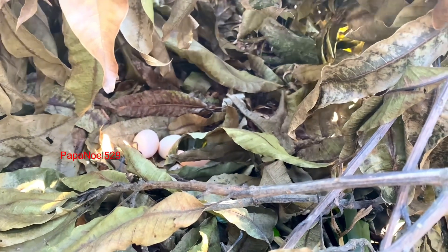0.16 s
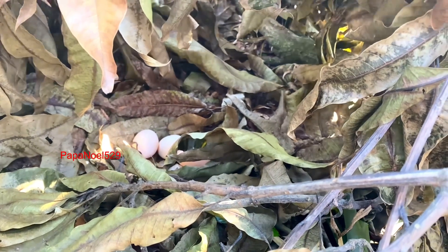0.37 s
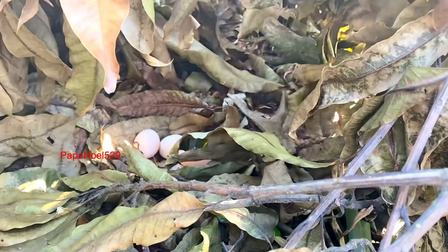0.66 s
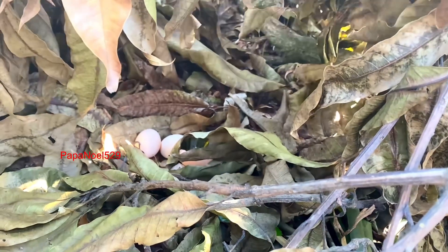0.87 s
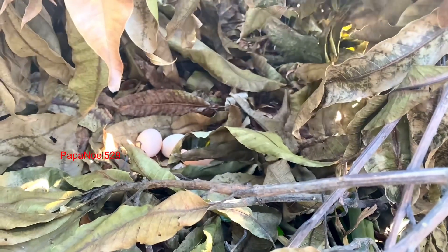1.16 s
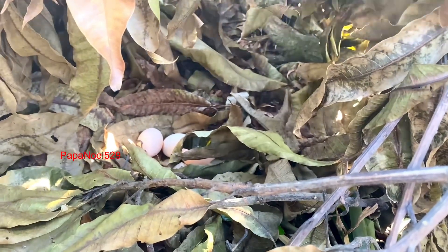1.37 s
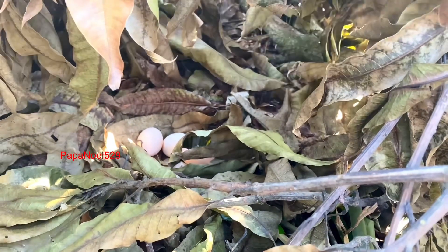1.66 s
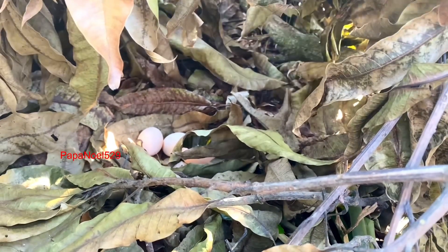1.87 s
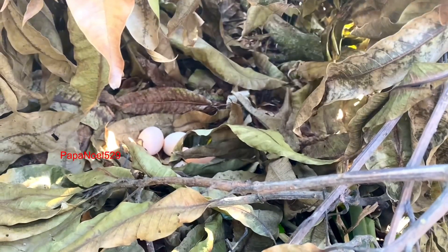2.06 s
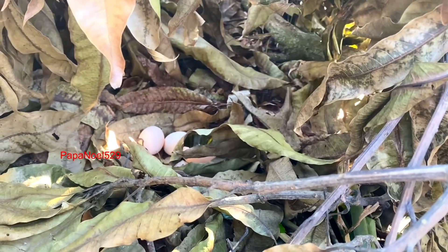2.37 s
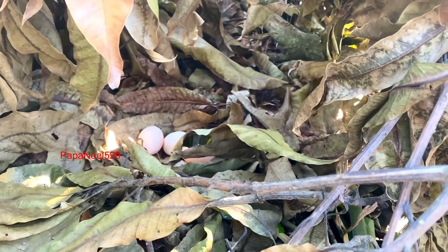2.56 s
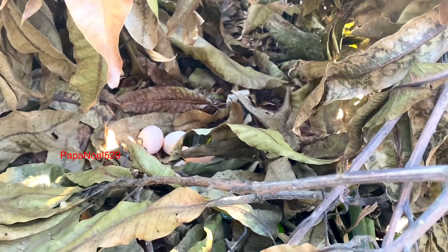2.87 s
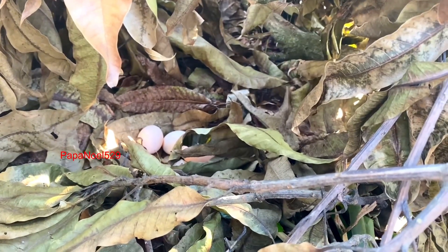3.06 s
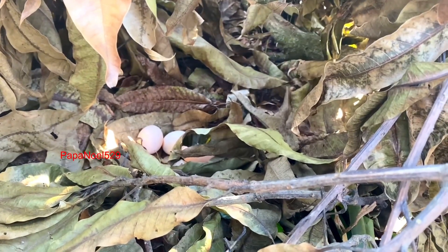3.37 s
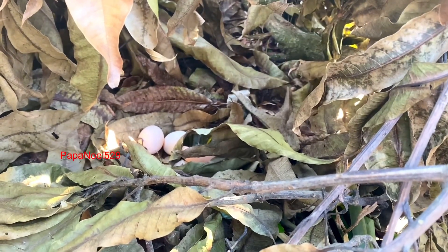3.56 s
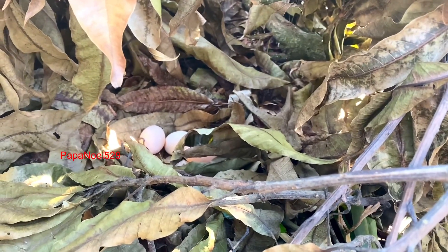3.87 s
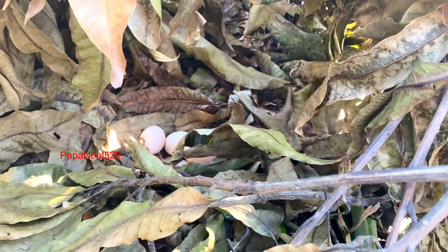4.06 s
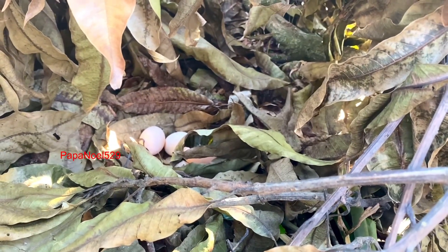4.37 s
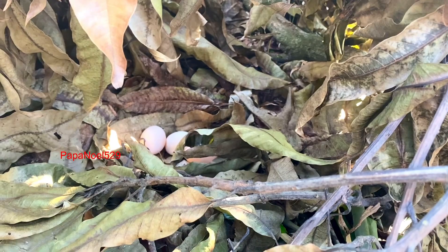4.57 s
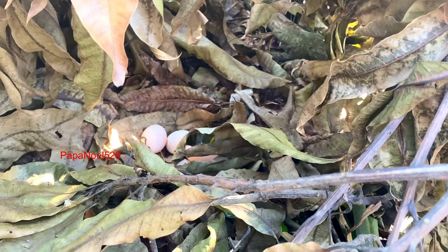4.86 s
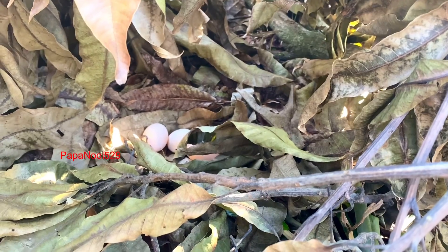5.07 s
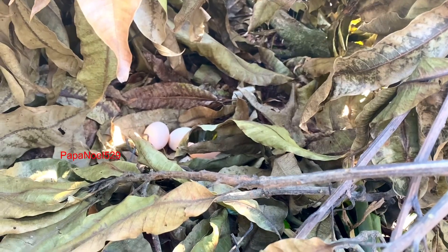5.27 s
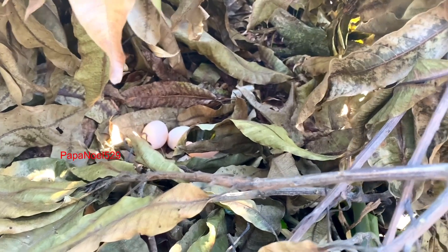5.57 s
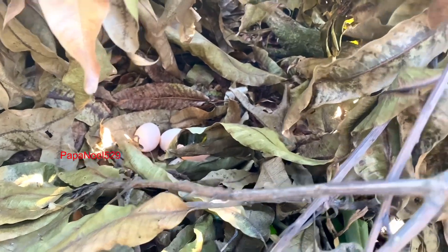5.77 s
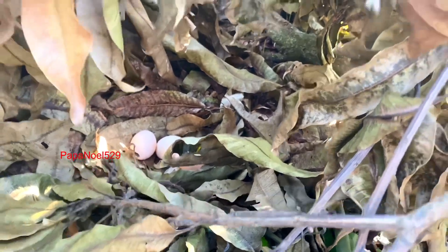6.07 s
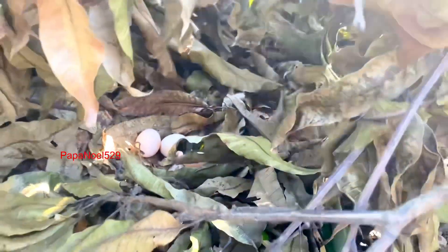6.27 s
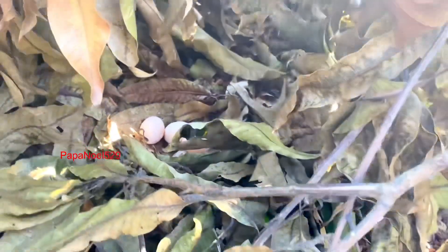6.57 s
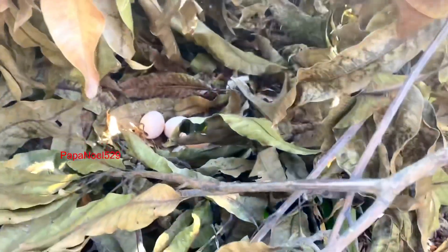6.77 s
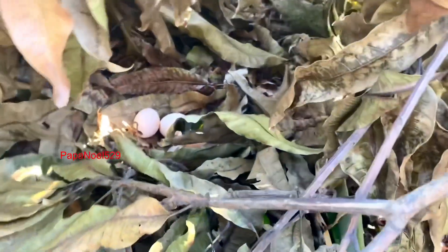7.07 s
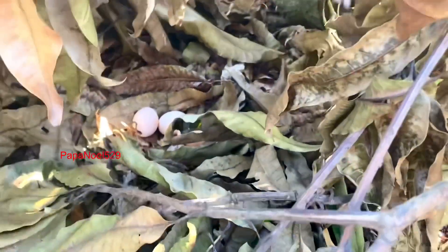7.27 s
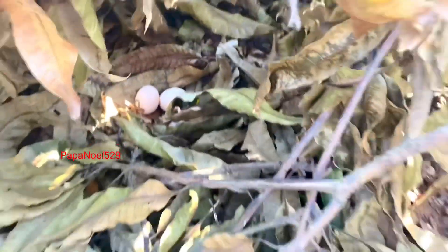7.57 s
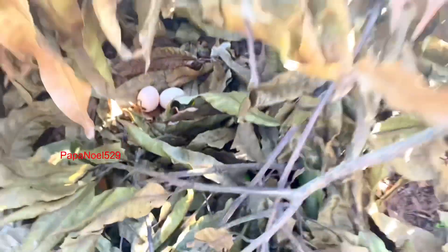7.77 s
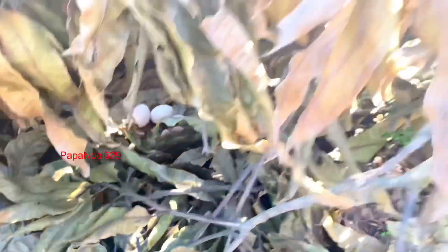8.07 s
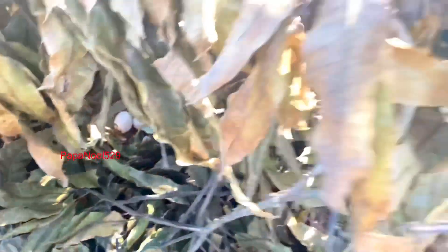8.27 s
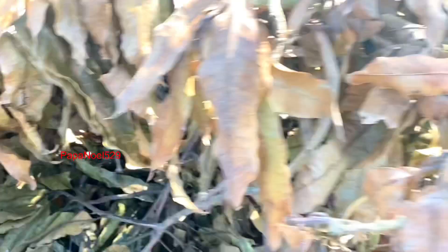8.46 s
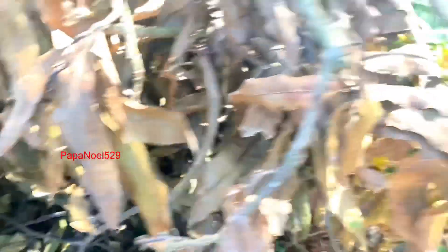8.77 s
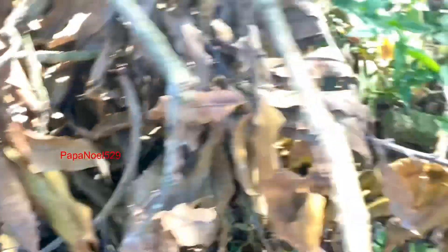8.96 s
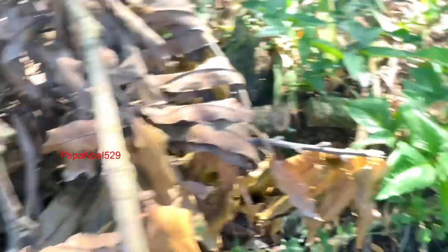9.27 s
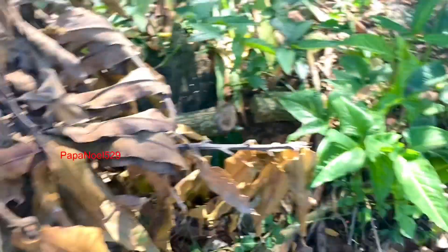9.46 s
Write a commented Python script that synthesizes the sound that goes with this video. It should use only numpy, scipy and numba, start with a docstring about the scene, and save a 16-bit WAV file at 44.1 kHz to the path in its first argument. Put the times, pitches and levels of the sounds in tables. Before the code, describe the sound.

A nearby hen cackles in runs of short clucks and rasping squawks, while another fowl answers and dry leaves rustle and snap.

```python
"""Hen cackling in the bushes

A hen cackles near her nest: runs of short clucks, each broken by a long rasping squawk. A second fowl
further off answers with faint clucks and higher calls that start clean and break up. Both voices are
clapping membranes ringing a throat and a windpipe. Dry leaves rustle and snap close by, a hand bumps
the microphone, and a distant motor hums and fades."""
import sys
import numpy as np
from scipy import signal
from scipy.fft import rfft, irfft, next_fast_len
from scipy.io import wavfile
from scipy.ndimage import uniform_filter1d
from numba import njit

SR = 44100
rng = np.random.default_rng(int(sys.argv[2]) if len(sys.argv) > 2 else 0)


def to_wav(s):
    """Save 16-bit WAV."""
    ch = np.atleast_2d(s).T  # columns
    pcm = np.round(np.clip(ch, -1, 1) * 32767)  # PCM
    wavfile.write(sys.argv[1], SR, pcm.astype(np.int16))


N = 424683
T = np.arange(N) / SR


def undb(db):
    """Decibels to gain."""
    return 10 ** (np.asarray(db) / 20)


def unit(x):
    """Scale to rms 1."""
    return x / np.sqrt(np.mean(x ** 2) + 1e-18)


def steady(x):
    """Ride the level to a running rms of 1, keeping the fast flutter."""
    return x / np.sqrt(np.abs(uniform_filter1d(x ** 2, size=1500)) + 1e-12)


def follow(rows, t):
    """The columns of a curve at times t."""
    times, *columns = np.transpose(rows)
    return [np.interp(t, times, column) for column in columns]


def over_hz(rows, size):
    """The columns of a spectrum on the bins of a transform."""
    hz, *columns = np.transpose(rows)
    bin_hz = np.arange(size // 2 + 1) * SR / size
    return [np.interp(np.log(bin_hz + 1), np.log(hz), column) for column in columns]


def colour(x, spectrum, size=2048):
    """Minimum-phase EQ through points of (frequency [Hz], gain [dB])."""
    cepstrum = irfft(np.log(undb(over_hz(spectrum, size)[0])))
    cepstrum[1:size // 2] *= 2
    cepstrum[size // 2 + 1:] = 0
    return signal.fftconvolve(x, irfft(np.exp(rfft(cepstrum))))[:len(x)]


def add(track, at_s, x):
    """Mix a sound into a track."""
    start = max(int(at_s * SR), 0)
    x = x[..., :N - start]
    track[..., start:start + x.shape[-1]] += x


def drift(rate_hz, length=N):
    """Smooth random modulation around zero."""
    hold = int(SR / rate_hz)
    steps = np.repeat(rng.standard_normal(N // hold + 1), hold)
    return 0.88 * uniform_filter1d(steps, hold)[:length]


def gate(t, attack_s, release_s):
    """Linear fade in and out."""
    return np.clip((t - t[0]) / attack_s, 0, 1) * np.clip((t[-1] - t) / release_s, 0, 1)


@njit
def resonance(x, hz, width_hz):
    """Band-pass with a moving centre."""
    out, band_state, low_state = np.empty(len(x)), 0., 0.
    for i in range(len(x)):
        tuning, damping = np.tan(np.pi * hz[i] / SR), width_hz / hz[i]
        band = (band_state + tuning * (x[i] - low_state)) / (1 + tuning * (tuning + damping))
        band_state = 2 * band - band_state
        low_state += 2 * tuning * band
        out[i] = damping * band
    return out


def pan(x, placement, bearing=1):
    """A source off to one side reaches left and right with different phase and level."""
    size = next_fast_len(len(x) + 512)
    lead, balance_db = over_hz(placement, size)
    left = np.exp(.5j * lead * bearing) * undb(balance_db / 2)
    return irfft(rfft(x, size) * np.array([left, 1 / left]), size)[:, :len(x)]


def yard(x, near_db, near_s, far_db, t60_s):
    """Adds quick, bright scatter from ground and bushes, then a thin tail from the trees."""
    t = np.arange(SR // 2) / SR
    out = []
    for channel in x:
        near, far = rng.standard_normal((2, len(t)))
        near = colour(near, [(600, -10.5), (1400, 1.5), (3000, 0.5)])
        near = unit(near * (t > .002) * np.exp(-t / near_s))
        far = colour(far, [(300, -0.5), (900, -9.5), (2200, 2.5), (9000, -9.0)])
        far = unit(far * np.clip(t / 0.069, 0, 1) * undb(-60 * t / t60_s))
        echo = (undb(near_db) * near + undb(far_db) * far) / np.sqrt(len(t))
        out.append(channel + signal.fftconvolve(channel, echo)[:N])
    return np.array(out)


# The motor's hum, sagging and fading (time [s], pitch [Hz], relative level [dB])
MOTOR_HUM = [(0, 102.8, -48), (2.5, 99, -47.5), (4, 101.3, -50), (5.3, 100.3, -55), (6.2, 101, -60.5),
             (9.63, 95.25, -62)]


def motor(trim_db=-1):
    """A distant motor hums on one low, slightly unsteady tone."""
    hz, db = follow(MOTOR_HUM, T)
    phase = 2 * np.pi * np.cumsum(hz + .5 * drift(10)) / SR
    return np.sqrt(2) * np.sin(phase) * undb(db + trim_db + .6 * drift(5.7))


# Bass-heavy outdoor air (frequency [Hz], gain [dB])
AIR_EQ = [(20, -40.5), (45, -6), (75, 9), (125, -4), (200, -13), (400, -26.5), (900, -35), (2000, -41),
          (6000, -43), (15000, -60.5)]


def open_air(level_db=-56, width_db=-13):
    """A low murmur of open air, as a narrow mid/side noise bed."""
    mid, side = (unit(colour(rng.standard_normal(N), AIR_EQ)) * undb(0.16 * drift(5)) for _ in range(2))
    return undb(level_db) * (mid + undb(width_db) * side * np.array([[1], [-1]]))


# Leaves stirring round the hand (time [s], level [dB])
LEAF_STIR = [(0, -54), (1.6, -55), (2.2, -63), (2.8, -74), (4.85, -76.5), (5.5, -57), (6.1, -51),
             (6.8, -51.5), (7.5, -49.5), (8.9, -50), (9.45, -57.5)]
# The hand brushing through leaves (time [s], length [s], level [dB])
HAND_BRUSHES = [(0.097, 0.25, -48), (0.452, 0.11, -47.5), (0.645, 0.099, -46.5), (0.933, 0.27, -50),
                (1.4, 0.225, -52.5), (4.896, 0.21, -59), (6.933, 0.71, -46.5), (7.409, 0.37, -43),
                (7.853, 0.2, -41.5), (7.994, 0.38, -46), (8.557, 0.34, -42), (9.032, 0.32, -42.5),
                (9.501, 0.16, -40)]


def stirring():
    """How hard the leaves are moved: a slow stir, and a swell for each brush of the hand."""
    power = undb(follow(LEAF_STIR, T)[0]) ** 2
    for at_s, length_s, db in HAND_BRUSHES:
        swell = gate(np.arange(0, length_s, 1 / SR), attack_s=0.032, release_s=0.07)
        add(power, at_s, (undb(db) * swell) ** 2)
    return np.sqrt(power)


# Papery tone of dry leaves (frequency [Hz], gain [dB])
LEAF_EQ = [(100, -7), (250, -4), (700, 2), (1500, -3.5), (3000, -1), (6500, -1.5), (9000, -6.5),
           (12000, -7), (16000, -12.5)]


def leaves(grains_per_s=1200, spread_db=2.5, ticks_per_s=36, tick_db=6.5, left_lag_s=0.0002):
    """Dry leaves crackle in dense tiny grains and single crisp ticks, a little to the right."""
    grains = (rng.random((3, N)) < grains_per_s / SR) * rng.standard_normal((3, N))
    left, right, shared = grains * undb(spread_db * np.minimum(rng.exponential(size=(3, N)), 4))
    shared += (rng.random(N) < ticks_per_s / SR) * rng.standard_normal(N) * undb(tick_db)
    left += 0.61 * np.roll(shared, round(left_lag_s * SR))
    right += 0.61 * shared
    crackle = np.array([unit(colour(side, LEAF_EQ)) for side in (left, right)])
    flicker = undb(1.2 * drift(30) + 1.5 * drift(150))
    return yard(crackle * stirring() * flicker, near_db=3.0, near_s=0.00419, far_db=-26, t60_s=0.33)


# Twigs and dry leaves breaking (time [s], dry peak [dB], decay [s])
SNAP_HITS = [(0.101, -20, .0025), (0.1444, -27, .001), (0.2064, -18, 0.0021), (0.417, -28.5, .002),
             (0.4642, -23, 0.00184), (.692, -28, 0.00117), (0.91, -28.5, 0.0037), (0.97, -26, 0.0012),
             (1.355, -26.5, .002), (1.701, -37, .002), (1.787, -39, .002), (1.8095, -29, .003),
             (2.885, -51.5, 0.0027), (2.949, -46, .0025), (3.265, -60, .002), (3.608, -48, .0025),
             (5.299, -36.5, .0015), (6.0881, -41, .002), (6.936, -23.5, 0.023), (7.178, -19.5, 0.0019),
             (7.809, -25, .0025), (7.9039, -25, 0.016), (7.985, -24, .0012), (8.024, -20, .0012),
             (8.4262, -30, .001), (8.504, -30, .002), (8.514, -25, 0.00294), (8.779, -21, 0.00305),
             (8.945, -37, 0.00085), (8.983, -27.5, 0.00118), (9.39, -42, 0.0009), (9.404, -41, 0.00081),
             (9.5048, -28.5, .002), (9.5988, -15.5, 0.0011)]
# Broad, bright crack of a twig (frequency [Hz], gain [dB])
SNAP_EQ = [(150, -7.5), (700, 1.5), (1500, -1), (3500, 1), (7000, 0.5), (12000, -2.5), (16000, -5)]


def snaps():
    """Close up, twigs crack in a sharp tick and whole leaves crunch a little longer."""
    out, t = np.zeros((2, N)), np.arange(SR // 15) / SR
    for at_s, db, decay_s in SNAP_HITS:
        left, right, shared = rng.standard_normal((3, len(t))) * np.exp(-t / decay_s)
        snap = np.array([colour(shared + .5 * side, SNAP_EQ) for side in (left, right)])
        add(out, at_s, snap / np.abs(snap).max() * undb(db))
    return yard(out, near_db=-2, near_s=0.008, far_db=-24, t60_s=0.33)


def syrinx(hz, rough, halving, jitter, shimmer_db, air):
    """Membranes clap once a cycle; when rough, early or late, strong or weak, with a puff of air."""
    phase = np.cumsum(hz) / SR
    cycle = np.arange(int(phase[-1]))
    onset = np.interp(cycle, phase, np.arange(len(hz)))
    period, wild, weak = (np.interp(cycle, phase, curve + 0 * hz) for curve in (SR / hz, rough, halving))
    timing, force = rng.standard_normal((len(cycle), 2)).T
    odd = cycle % 2  # halving delays and weakens every other clap, adding a sub-octave
    onset = np.clip(onset + period * jitter * (wild * timing + weak * odd), 0, len(hz) - 2)
    strength = undb(shimmer_db * wild * force) * (1 - np.clip(weak, 0, 1) * odd)
    sample, fraction = onset.astype(int), onset % 1
    claps = np.bincount(sample, strength * (1 - fraction), len(hz))
    claps += np.bincount(sample + 1, strength * fraction, len(hz))
    puffs = unit(np.exp(-(phase % 1) / 0.75) * rng.standard_normal(len(hz)))
    return unit(claps) + air * rough * puffs


def windpipe(x, spacing_hz=480, width_hz=120, drift_hz=105, blunt_hz=5450, wander_s=0.0447):
    """The windpipe rings in a ladder of resonances, blunter up top, that wander as the neck strains."""
    position = np.arange(len(x)) / SR / wander_s
    steps = np.arange(int(position[-1]) + 2)
    out = 0
    for mode in range(2, 30):
        blunt = 1 + (mode * spacing_hz / blunt_hz) ** 2
        detune, swell = (np.interp(position, steps, rng.standard_normal(len(steps))) for _ in range(2))
        hz = np.clip((mode + .5) * spacing_hz + drift_hz * np.sqrt(blunt) * detune, 100, .45 * SR)
        strength = rng.choice([-1, 1]) * undb(3.0 * swell) / np.sqrt(blunt)
        out = out + strength * resonance(x, hz, width_hz * blunt)
    return out


# Hollow body of either bird's cluck (frequency [Hz], gain [dB])
CLUCK_BODY_EQ = [(100, -22.5), (200, -19), (470, -4.5), (590, -10), (750, -3), (1020, -1.5), (1360, -11),
                 (2200, -21)]


def cluck(throat_hz, rasp_eq, rasp_db, width_hz, chest_db):
    """A few slow claps speed up and swell while the beak opens and shuts; no two clucks are alike."""
    usual_s, usual_start_hz, usual_top_hz, usual_throat_hz = .06, 170.4, 328.7, 949.4
    t = np.arange(int(1.45 * usual_s * SR)) / SR
    stretch, lift = 1 + np.array([.05, .14]) * rng.standard_normal(2)
    progress = np.clip(t / (usual_s * stretch), 0, 1)
    hz = lift * (usual_start_hz + (usual_top_hz - usual_start_hz) * np.sin(np.pi * progress * .7))
    effort_db, = follow([(0, -12.5), (.18, -9.5), (.38, -4), (.58, -8), (.8, -15.5), (1, -31.5)],
                        progress)
    source = syrinx(hz, rough=.7, halving=0, jitter=.11, shimmer_db=1.5, air=.15) * undb(effort_db)
    formant_hz = throat_hz * (0.84 + 0.119 * np.sin(np.pi * progress))
    body = resonance(colour(source, CLUCK_BODY_EQ), formant_hz, width_hz)
    # the air sacs hoot an octave below the throat
    chest_eq = [(90, -11), (210, 9), (330, -1), (480, 1), (640, -17), (1500, -19.5)]
    chest = resonance(colour(source, chest_eq), formant_hz / 2, width_hz=103.)
    # the upper resonances shift with the throat
    rasp = colour(windpipe(source), [(f * throat_hz / usual_throat_hz, db) for f, db in rasp_eq])
    voice = unit(body) + undb(rasp_db) * unit(rasp) + undb(chest_db) * unit(chest)
    return unit(voice) * gate(t, 0.0034, 0.0098)


# The far fowl's faint clucks (time [s], level [dB], throat resonance [Hz])
FAR_CLUCK_CUES = [(0.104, -42, 890), (.99, -53, 860), (1.213, -45, 840), (1.443, -44.5, 860),
                  (1.672, -41, 900), (2.761, -40, 934), (4.756, -39, 970), (5.005, -42, 932),
                  (6.133, -38.5, 920), (6.72, -44, 860), (7.885, -40, 875), (8.529, -36.5, 900),
                  (8.789, -38.5, 1010)]
# Their dull edge (frequency [Hz], gain [dB])
FAR_RASP_EQ = [(900, 0), (1400, -10), (2150, -9.5), (2600, -15.5), (3300, -16), (4500, -31.5),
               (9000, -38.5)]


def far_clucks():
    """The second bird clucks through a narrow throat resonance, with little chest."""
    out = np.zeros(N)
    for at_s, db, throat_hz in FAR_CLUCK_CUES:
        add(out, at_s, undb(db) * cluck(throat_hz, FAR_RASP_EQ, rasp_db=-9, width_hz=97., chest_db=-20))
    return out


# The hen's runs of clucks (time [s], level [dB], throat resonance [Hz])
HEN_CLUCK_CUES = [(0.133, -32, 774), (0.377, -31.5, 855), (0.631, -29, 856), (0.839, -31, 878),
                  (1.063, -32, 937), (1.299, -28.5, 940), (1.524, -28, 930), (1.767, -27, 983),
                  (2.43, -30, 1006), (2.688, -29.5, 997), (2.989, -33, 940), (3.248, -32.5, 954),
                  (3.497, -34, 904), (3.746, -32, 980), (4.357, -29.5, 1010), (4.653, -29, 986),
                  (4.893, -27.5, 985), (5.158, -29.5, 940), (5.396, -28.5, 962), (5.994, -23, 982),
                  (6.259, -35, 803), (6.549, -30, 920), (6.806, -29.5, 900), (7.067, -32, 860),
                  (7.309, -30.5, 904), (7.914, -27.5, 836), (8.139, -25.5, 830), (8.376, -26, 870),
                  (8.62, -26, 926), (8.913, -28, 850), (9.402, -36.5, 961)]
# Their bright edge (frequency [Hz], gain [dB])
HEN_RASP_EQ = [(1000, -24), (1550, -5), (1900, 8.5), (2400, -15), (2850, -5), (3450, 3), (4200, -6.5),
               (5500, -20.5), (8000, -19), (12000, -32)]
# Her chest tone, strongest while she is still calm (time [s], level against the body [dB])
CHEST_TONE = [(0, -12), (1.1, -12), (1.8, -18.5), (4, -16.5), (6, -18.5), (6.6, -14), (8, -23),
              (9.63, -16.5)]


def hen_clucks(usual_rasp_db=-19, usual_chest_db=-18.5, dulling=0.2):
    """Yields (time, sound) for each cluck: the chestier her voice, the duller its edge."""
    for at_s, db, throat_hz in HEN_CLUCK_CUES:
        chest_db, = follow(CHEST_TONE, at_s)
        rasp_db = usual_rasp_db - dulling * (chest_db - usual_chest_db)
        yield at_s, undb(db) * cluck(throat_hz, HEN_RASP_EQ, rasp_db, width_hz=176., chest_db=chest_db)


# The hen's squawks (time [s], hold [s], level [dB], throat resonance [Hz], brightness [dB],
# rasp tilt [dB/octave], flare [dB], opening pitch [Hz], flare roughness [0-1], rasp roughness [0-1],
# attack [s])
SQUAWK_CUES = [(1.878, 0.29, -20, 985, -10.5, -2, 1, 424, 0.21, 0.86, 0.025),
               (3.876, 0.285, -18.5, 1060, -14, -1.5, 4, 372.8, 0.79, 0.71, 0.015),
               (5.517, 0.28, -17.5, 1030, -10, 0, 4, 429.6, 0.24, .85, 0.0244),
               (7.420, 0.25, -18.5, 1024, -7.5, -1, 6.5, 455.8, 0.25, 0.79, 0.084),
               (9.031, 0.2639, -16.5, 977, -14, 0, 7.5, 394, 0.29, 0.57, 0.033)]
# Throaty body of a squawk (frequency [Hz], gain [dB])
SQUAWK_BODY_EQ = [(120, -53.5), (200, 8.5), (320, -6.5), (490, 1.5), (600, 0), (720, 2), (1000, -3),
                  (1310, -0.5), (1470, 1), (1750, -23.5), (3000, -32)]
# Its harsh top (frequency [Hz], gain [dB])
SQUAWK_RASP_EQ = [(900, -35.5), (1450, 9.5), (1720, -1.5), (1950, 6.5), (2300, -2.5), (2650, 3.5),
                  (3050, -1.5), (3400, -1), (3800, -0.5), (4300, -1.5), (5000, -8), (6500, -8.5),
                  (8500, -9.5), (10500, -16.5), (16000, -30)]


def squawk(hold_s, db, throat_hz, bright_db, tilt_db, flare_db, opening_hz, flare_rough, rasp_rough,
           attack_s):
    """A forced call flares bright, then drops in pitch to a rasp that rings throat and windpipe."""
    rasp_hz, drop_s, throat_opens_s = 331.1, .06, 0.08
    flare_at_s, flare_s, tail_s, fade_db = 0.045, .028, 0.053, 17
    t = np.arange(0, hold_s + tail_s, 1 / SR)
    tail = np.clip((t - hold_s) / tail_s, 0, 1)
    flare = np.exp(-((t - flare_at_s) / flare_s) ** 2)
    sag = 1 - 0.112 * tail
    rough = rasp_rough + (flare_rough - rasp_rough) * flare
    hz = (rasp_hz + (opening_hz - rasp_hz) * np.exp(-(t / drop_s) ** 2)) * sag
    hz *= 1 + .06 * rough * drift(60, len(t))
    source = syrinx(hz, rough, halving=.35 * rough, jitter=.076, shimmer_db=2.5, air=.8)
    formant_hz = throat_hz * (1 - 0.05 * np.exp(-(t / throat_opens_s) ** 2)) * sag
    formant_hz *= 1 + 0.04 * drift(23.4, len(t))
    throat = resonance(colour(source, SQUAWK_BODY_EQ), formant_hz, width_hz=140.)
    beak = resonance(throat, formant_hz, width_hz=1300.)
    # the windpipe's ring sinks slightly as the breath runs out
    pipe, spent = windpipe(source), t / t[-1]
    tilted_eq = [(f, gain + tilt_db * np.log2(f / throat_hz)) for f, gain in SQUAWK_RASP_EQ]
    early = colour(pipe, [(f * 1.015, gain) for f, gain in tilted_eq])
    late = colour(pipe, tilted_eq)
    rasp = steady((1 - spent) * early + spent * late) * gate(t, 0.01015, 0.0524)
    voice = steady(beak) + undb(bright_db + flare_db * flare) * rasp
    return voice * undb(db - fade_db * tail) * np.sqrt(gate(t, attack_s, 0.02))


# The hen's stereo image (frequency [Hz], left phase lead [rad], left minus right [dB])
HEN_PLACEMENT = [(100, -0.37, -18), (400, -1.5, -0.5), (576.6, -2.5, -1.5), (861, -2.5, -3.5),
                 (1220, -2.5, -2.5), (1430, -3, 2), (2500, -6, -3.5), (3200, -5, -0.5), (5820, -4.5, 2),
                 (8000, -9, -5), (15100, -18, 5)]
# How far to the side she is as the microphone turns (time [s], share of the phase lead [0-1])
HEN_BEARING = [(0, 0.94), (5.8, 1), (7.6, 0.95), (9.2, 0.86)]


def hen():
    """The near hen clucks and squawks in the bushes, off to the right."""
    out = np.zeros((2, N))
    calls = list(hen_clucks()) + [(at_s, squawk(*shape)) for at_s, *shape in SQUAWK_CUES]
    for at_s, call in calls:
        bearing, = follow(HEN_BEARING, at_s)
        add(out, at_s, pan(call, HEN_PLACEMENT, bearing))
    return yard(out, near_db=-7, near_s=.005, far_db=-25, t60_s=.4)


# The far fowl's answers (time [s], hold [s], level [dB], top pitch [Hz], splits after [s],
# breaks after [s], clean roughness [0 = pure], broken roughness [0 = pure], clean ring [Hz],
# broken ring [Hz], ring gain [dB], strain gain [dB], attack [s])
ANSWER_CUES = [(2.260, 0.31, -25, 677.7, 0.094, 0.166, 0.07, 0.66, 1925, 1908, 1.5, 4.5, 0.0058),
               (4.238, 0.33, -25, 680, 0.089, 0.14, 0.47, 1.25, 2020, 1840, 4, 2.5, 0.016),
               (6.214, .29, -27, 673, 0.062, .105, 0.33, 1.3, 1947, 1757, 7.5, -2, 0.019),
               (8.006, 0.32, -25.5, 662, 0.048, .13, 0.59, 1.24, 2002, 1964, 1, -9, 0.013)]
# Its nasal throat (frequency [Hz], gain [dB])
ANSWER_THROAT_EQ = [(200, -34), (480, -21), (640, -5.5), (1000, 8), (1300, -5.5), (1480, -8.5), (1720, -3),
                    (1980, -6.5), (2350, -14), (3350, -7), (4100, -14), (5400, -17.5), (7800, -15.5),
                    (11000, -28), (16000, -41.5)]


def answer(hold_s, db, top_hz, split_s, break_s, clean_rough, broken_rough, clean_ring_hz,
           broken_ring_hz, ring_db, strain_db, attack_s):
    """A high call climbs, splits into a sub-octave, then breaks into a rasp that sinks and steadies."""
    start_hz, end_hz, strain_low_hz, strain_top_hz = 612.3, 633.6, 1885, 2860
    catch_s, switch_s, tail_s = 0.019, 0.0079, 0.05
    swell_db, fade_db, growl_db = 2.5, 22, -15
    t = np.arange(0, hold_s + tail_s, 1 / SR)
    rise = np.clip(t / break_s, 0, 1)
    climb = np.sqrt(rise)
    sink = np.clip((t - break_s) / (hold_s - break_s), 0, 1)
    tail = np.clip((t - hold_s) / tail_s, 0, 1)
    split, broke = (np.clip((t - at_s) / switch_s + .5, 0, 1) for at_s in (split_s, break_s))
    sag = 1 - 0.12 * tail
    rough = (1 - broke) * clean_rough + broke * (broken_rough + (0.5 - broken_rough) * sink ** 2)
    # the voice catches as it starts and as it stops
    rough = np.maximum(rough, 1.5 * (np.exp(-(t / catch_s) ** 2) + np.sqrt(tail)))
    hz = (start_hz + (top_hz - start_hz) * climb + (end_hz - top_hz) * sink) * sag
    hz *= 1 - .018 * (1 - split)  # a small jump up at the split
    hz *= 1 + .019 * rough * drift(44.96, len(t))
    halving = 0.56 * split * (1 - broke) + 0.22 * broke
    rasp = syrinx(hz, rough, halving, jitter=.09, shimmer_db=3.5, air=.5)
    tone = syrinx(hz, rough=0, halving=0, jitter=0, shimmer_db=0, air=0) * gate(t, 0.0227, 0.053)
    source = rasp + .45 * (1 - clean_rough) * (1 - sink / 2) * tone + .65 * rough * unit(windpipe(rasp))
    # muffled until the beak is wide open, and again as it shuts
    muffled = colour(source, [(1100, -7.0), (3500, -15)])
    voice = colour(muffled + (source - muffled) * gate(t, 0.064, 0.16), ANSWER_THROAT_EQ)
    # the strained beak resonance sweeps up to the break and falls back
    strain_hz = strain_low_hz + (strain_top_hz - strain_low_hz) * rise * (1 - np.sqrt(sink))
    strain = resonance(voice, strain_hz, width_hz=1000.) * gate(t, 0.038, 0.13)
    voice = steady(voice + undb(strain_db) * strain)
    # overtones glide through a sharp throat ring
    ring_hz = clean_ring_hz + (broken_ring_hz - clean_ring_hz) * broke
    ring_hz *= 1 + .028 * broke * drift(20.7, len(t))
    ring = resonance(voice, ring_hz * sag, width_hz=54.) * gate(t, .05, .07)
    # roughness wakes a lower resonance
    growl_hz = 947 * sag * (1 + 0.026 * drift(25, len(t)))
    growl = resonance(source, growl_hz, width_hz=110.)
    growl = steady(resonance(growl, growl_hz, width_hz=110.))
    call = voice + undb(ring_db) * ring + undb(growl_db) * rough * growl
    effort_db = swell_db * (climb - sink ** 2 - 1) - fade_db * tail
    return call * undb(db + effort_db) * gate(t, attack_s, 0.01345)


# The far fowl's stereo image (frequency [Hz], left phase lead [rad], left minus right [dB])
FAR_PLACEMENT = [(292, 0, -11), (625, 2.5, 8.5), (865, 0.96, 2.5), (1250, 0, 0), (1643, 1.43, -2),
                 (2300, 0.2, -5.5), (2910, 3.5, 2.5), (4897, 1, 1), (8000, 1.8, -1)]


def far_fowl():
    """The second bird clucks and answers, with more of the yard around it."""
    out = far_clucks()
    for at_s, *shape in ANSWER_CUES:
        add(out, at_s, answer(*shape))
    return yard(pan(out, FAR_PLACEMENT), near_db=-3, near_s=.006, far_db=-21, t60_s=.36)


# Soft handling thuds (time [s], peak [dB])
BUMP_HITS = [(3.247, -39), (7.489, -38), (7.563, -32.5), (8.702, -46), (8.819, -43.5)]


def bumps(decay_s=0.0067):
    """The hand knocks softly on the microphone's case."""
    out, t = np.zeros(N), np.arange(SR // 6) / SR
    for at_s, db in BUMP_HITS:
        knock = rng.standard_normal(len(t)) * np.exp(-t / decay_s)
        thud = colour(knock, [(25, -15), (60, 23.5), (150, -11), (400, -6.0), (2000, -53)])
        add(out, at_s, thud / np.abs(thud).max() * undb(db))
    return out


def scene():
    """Both birds, the leaves and the handling over a bed of motor and air."""
    return hen() + far_fowl() + leaves() + snaps() + bumps() + motor() + open_air()


def record(dry, cutoff_hz=15900):
    """A steep low-pass takes off the very top."""
    return signal.sosfilt(signal.ellip(10, .2, 80, cutoff_hz, fs=SR, output="sos"), dry)


dry = scene()
out = record(dry)
to_wav(out)
```